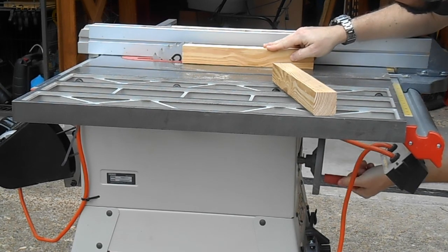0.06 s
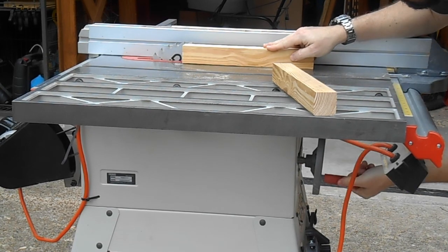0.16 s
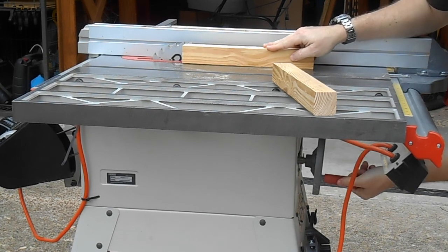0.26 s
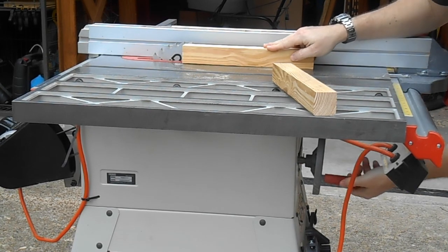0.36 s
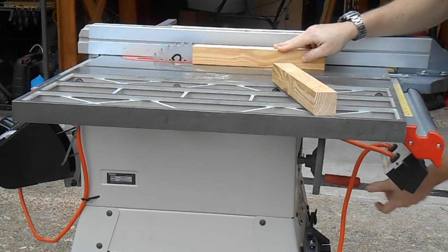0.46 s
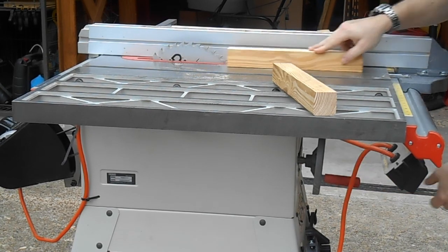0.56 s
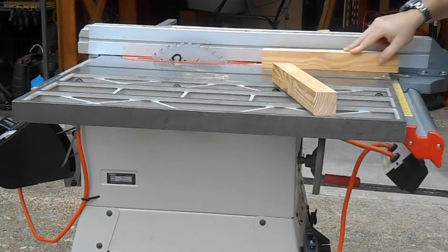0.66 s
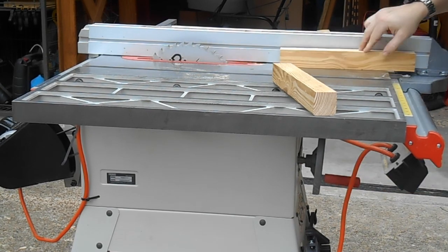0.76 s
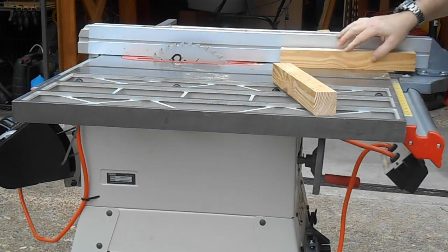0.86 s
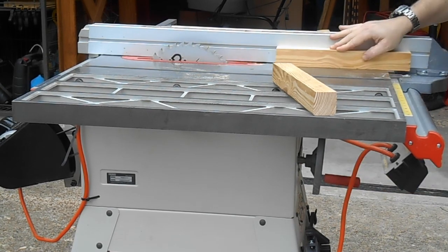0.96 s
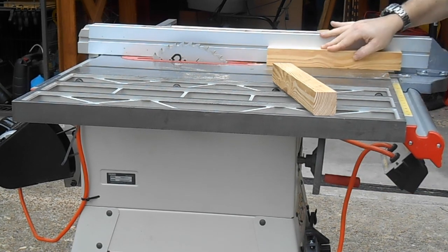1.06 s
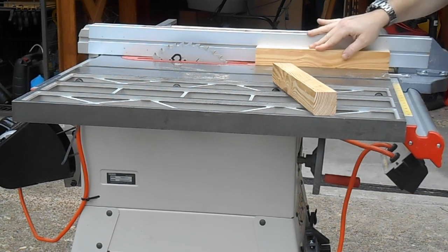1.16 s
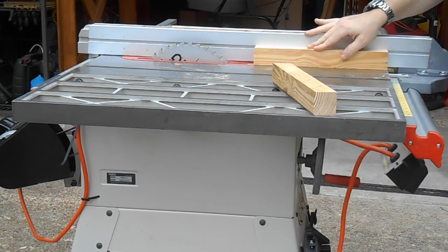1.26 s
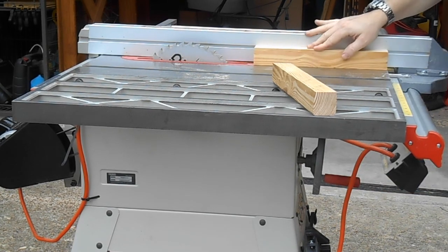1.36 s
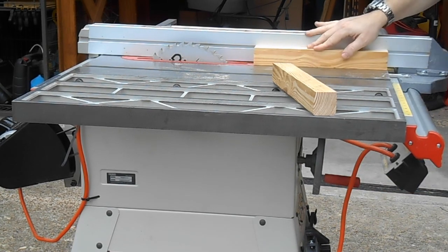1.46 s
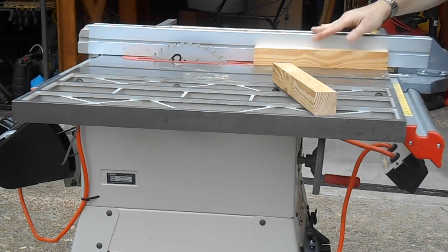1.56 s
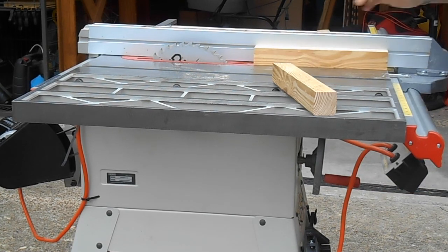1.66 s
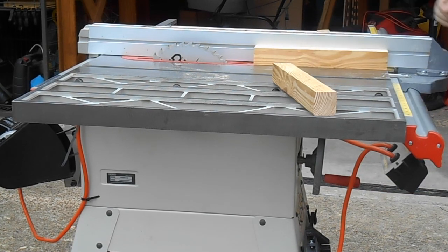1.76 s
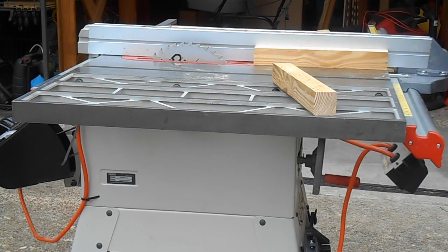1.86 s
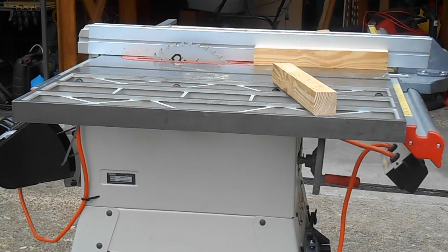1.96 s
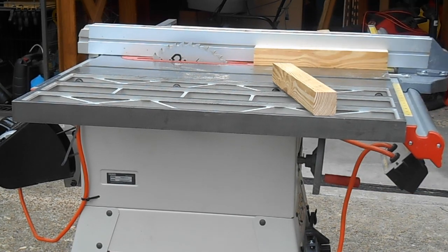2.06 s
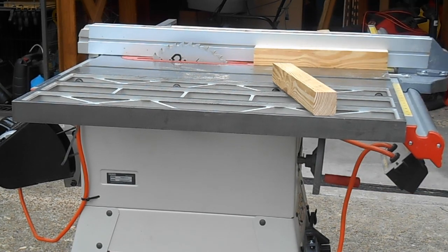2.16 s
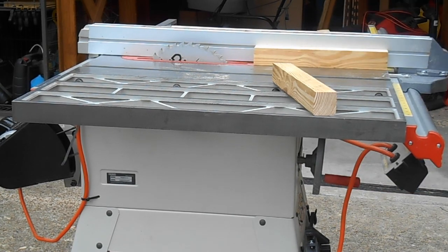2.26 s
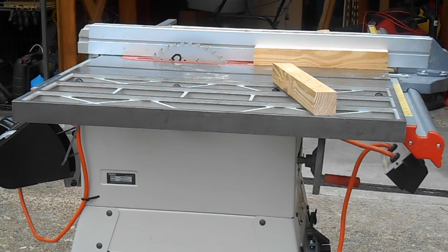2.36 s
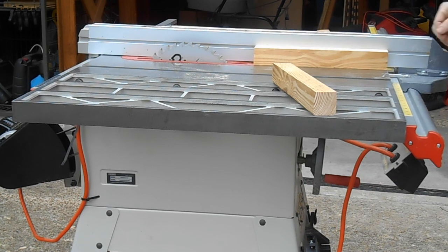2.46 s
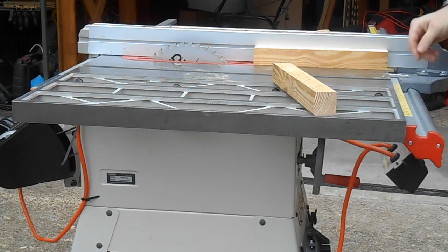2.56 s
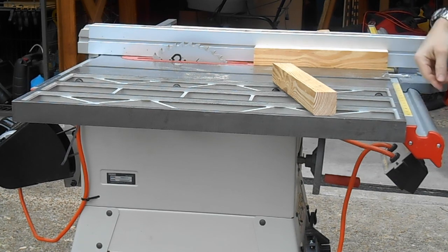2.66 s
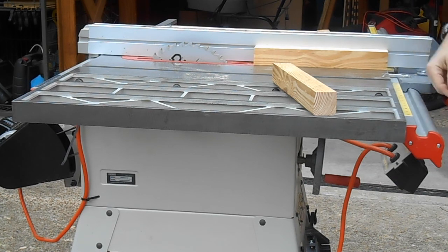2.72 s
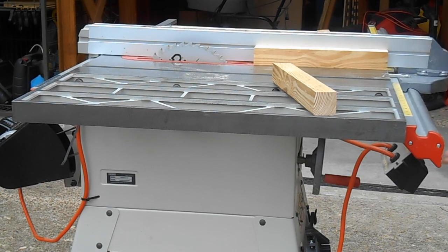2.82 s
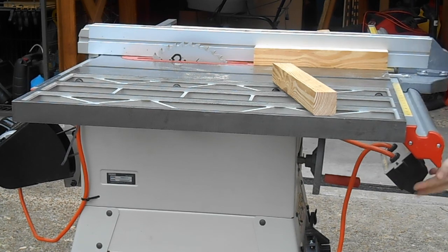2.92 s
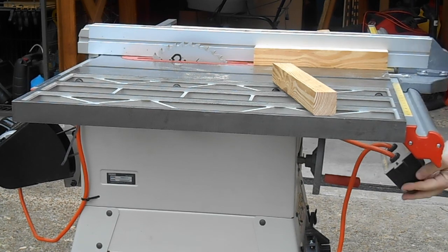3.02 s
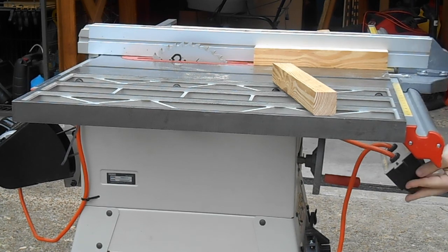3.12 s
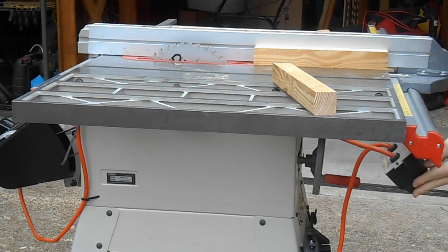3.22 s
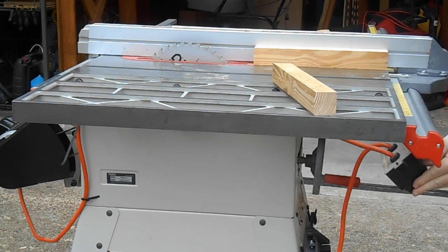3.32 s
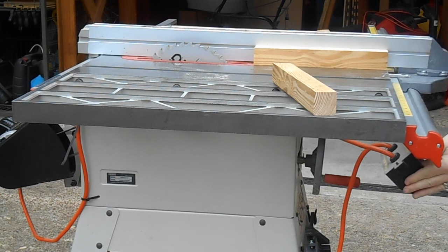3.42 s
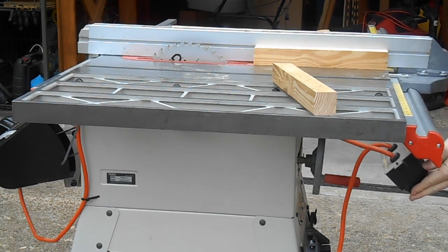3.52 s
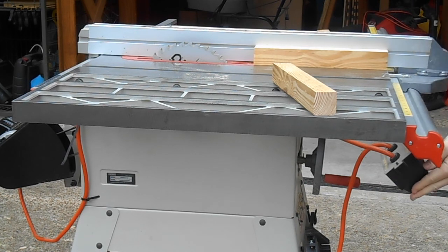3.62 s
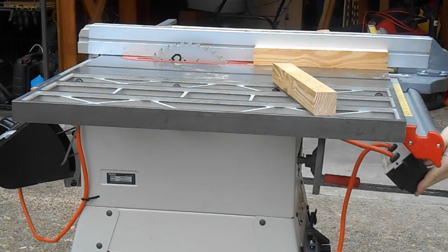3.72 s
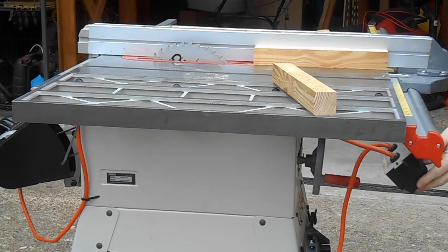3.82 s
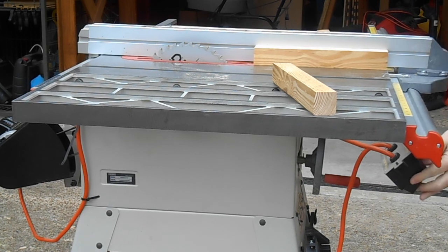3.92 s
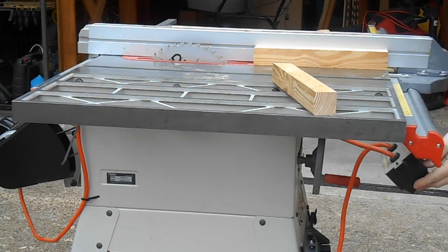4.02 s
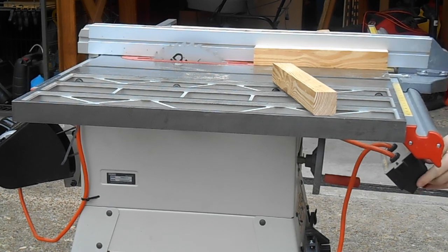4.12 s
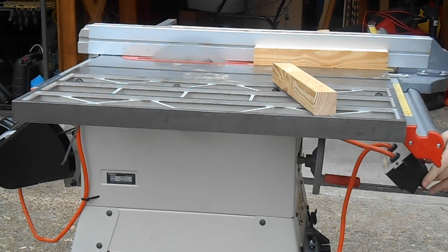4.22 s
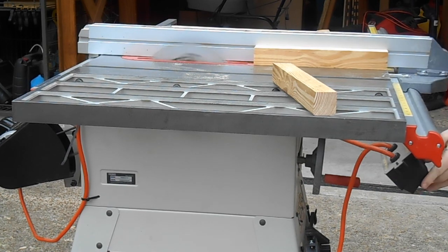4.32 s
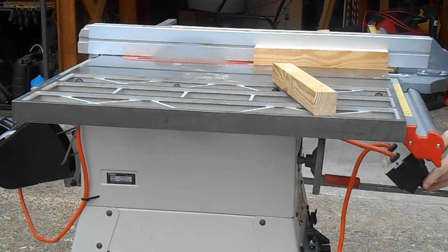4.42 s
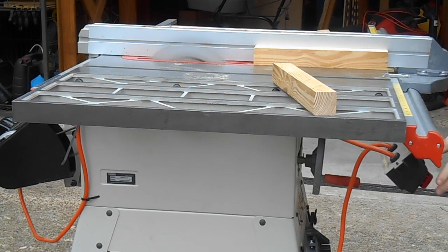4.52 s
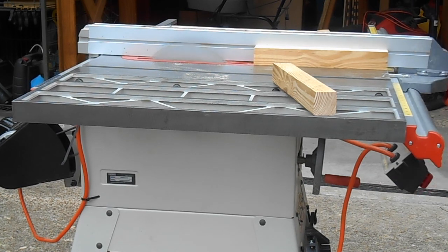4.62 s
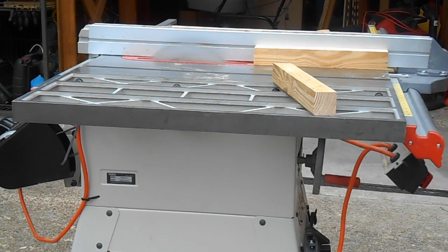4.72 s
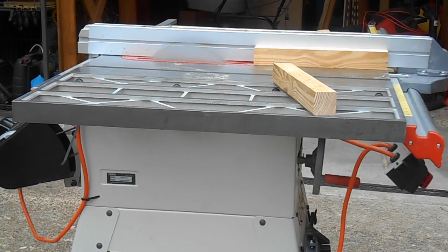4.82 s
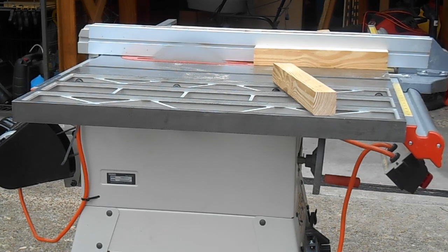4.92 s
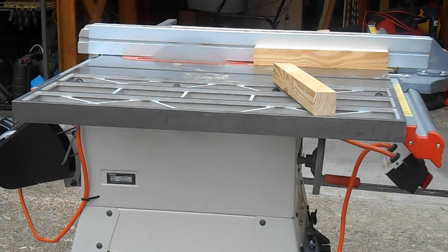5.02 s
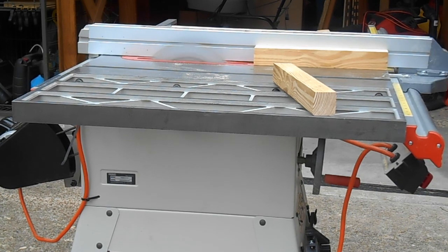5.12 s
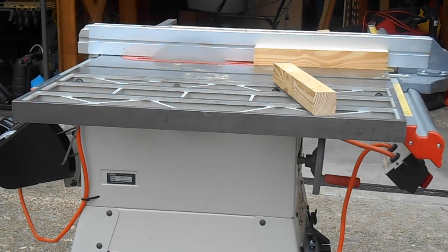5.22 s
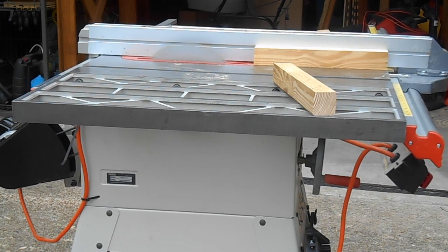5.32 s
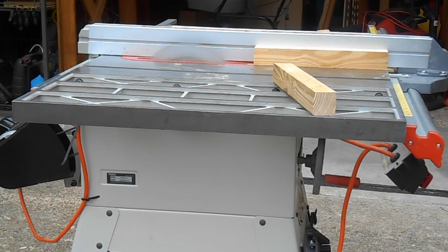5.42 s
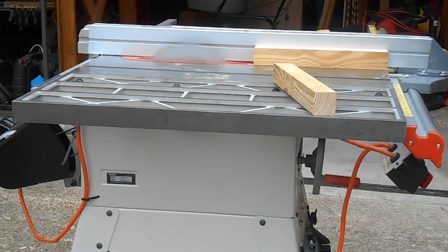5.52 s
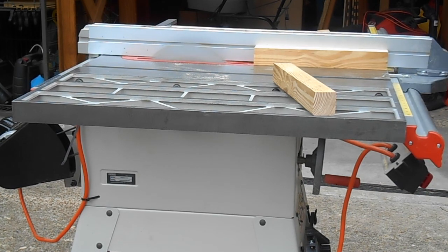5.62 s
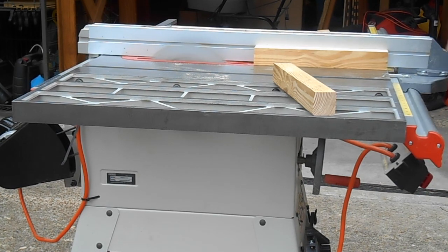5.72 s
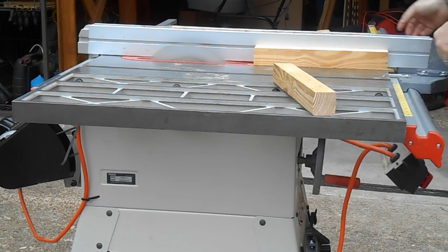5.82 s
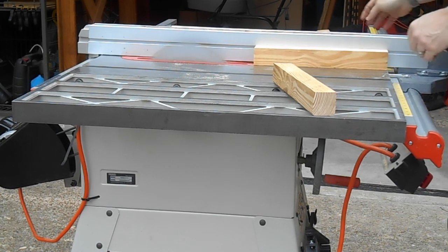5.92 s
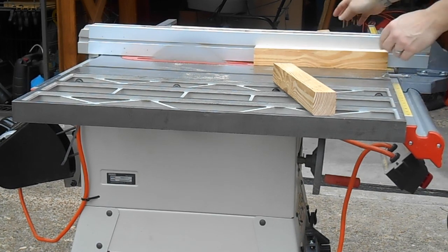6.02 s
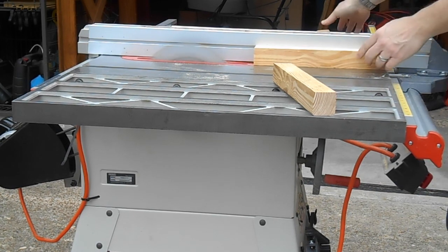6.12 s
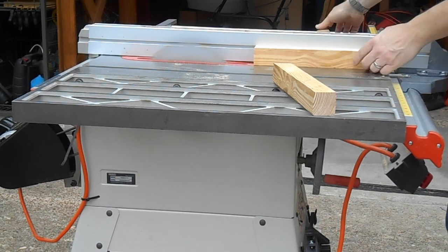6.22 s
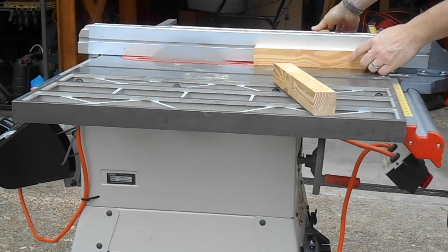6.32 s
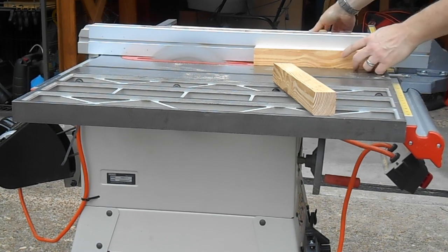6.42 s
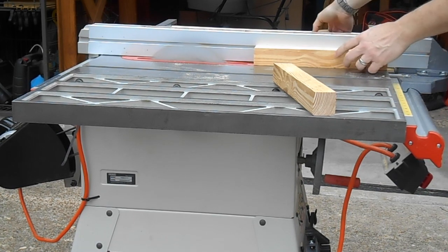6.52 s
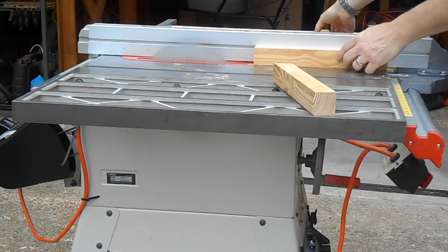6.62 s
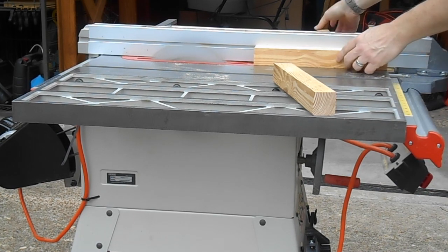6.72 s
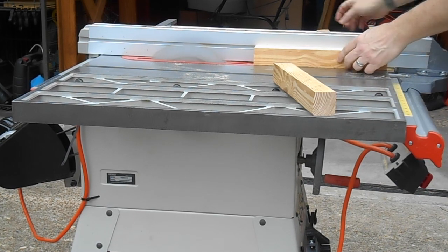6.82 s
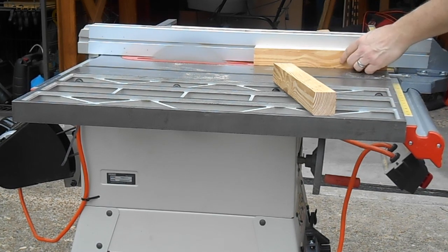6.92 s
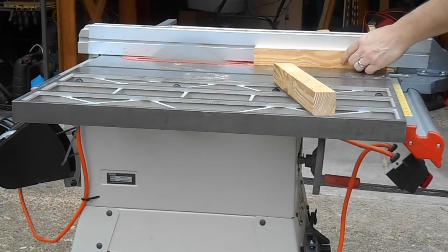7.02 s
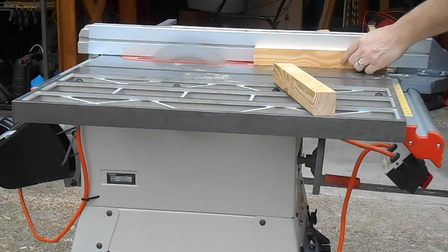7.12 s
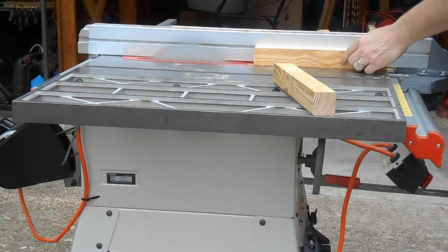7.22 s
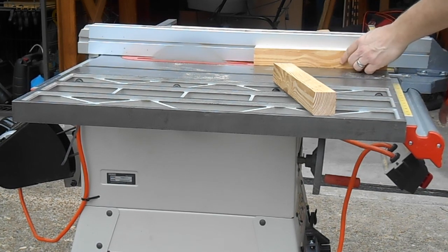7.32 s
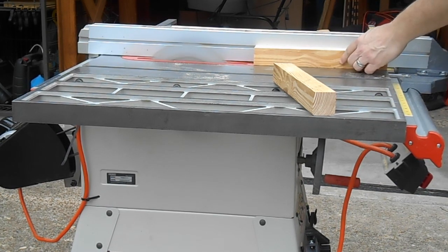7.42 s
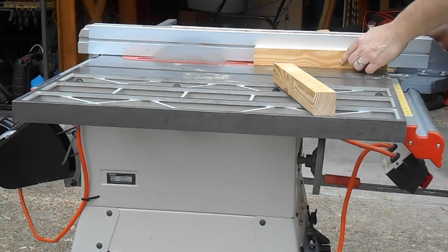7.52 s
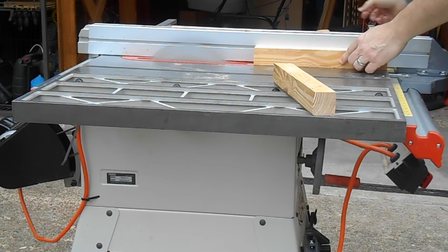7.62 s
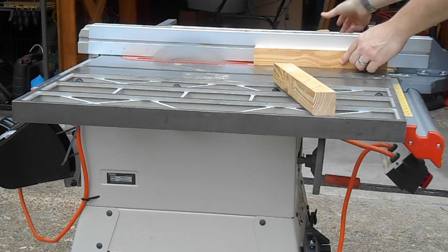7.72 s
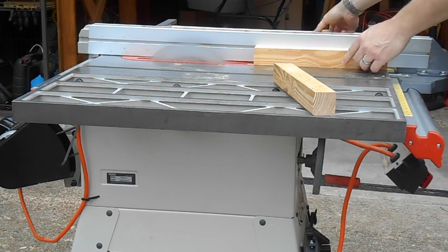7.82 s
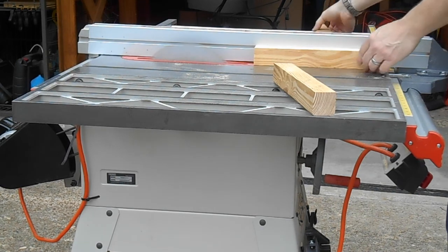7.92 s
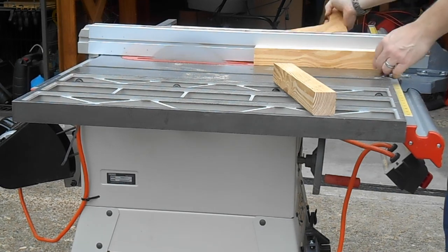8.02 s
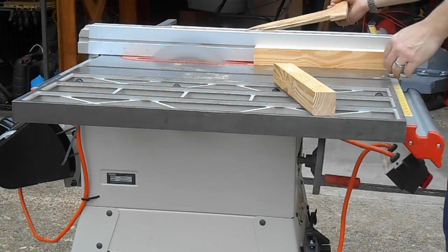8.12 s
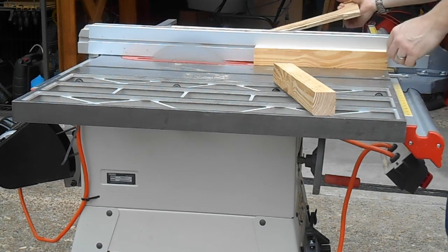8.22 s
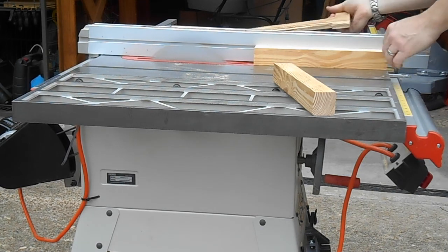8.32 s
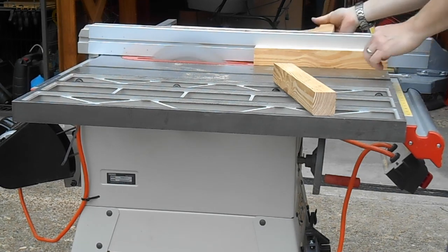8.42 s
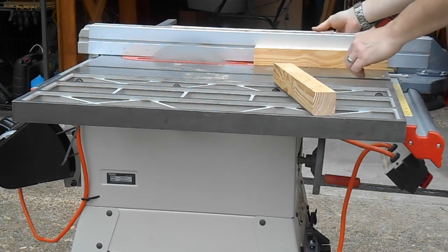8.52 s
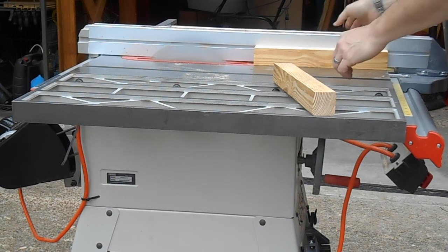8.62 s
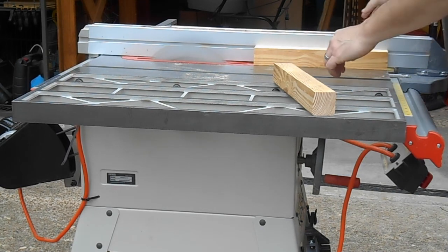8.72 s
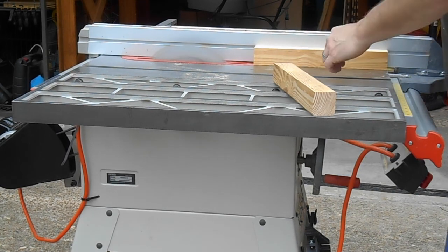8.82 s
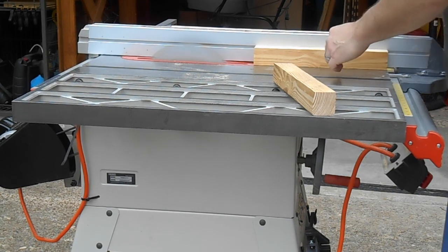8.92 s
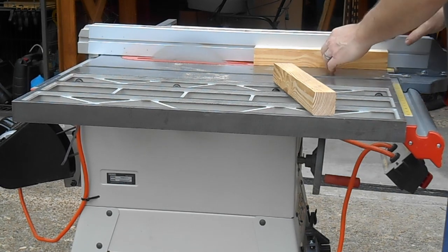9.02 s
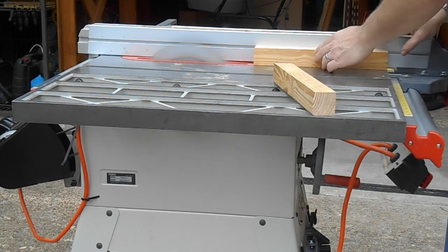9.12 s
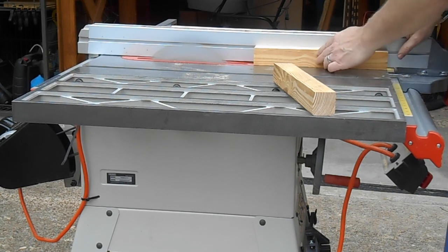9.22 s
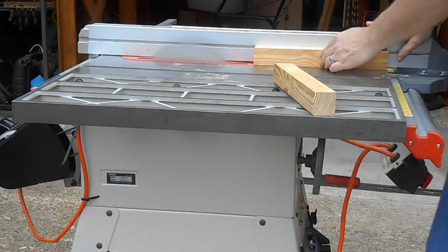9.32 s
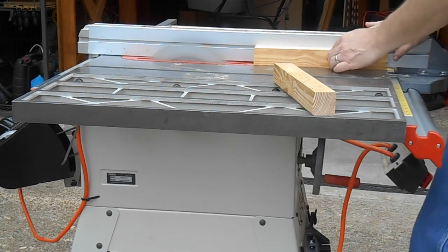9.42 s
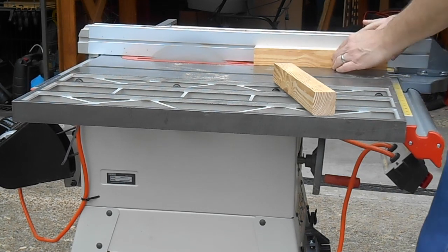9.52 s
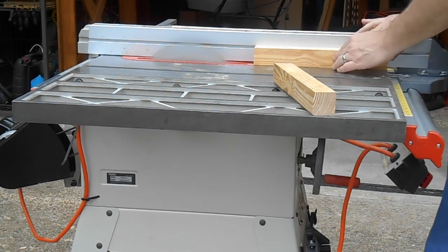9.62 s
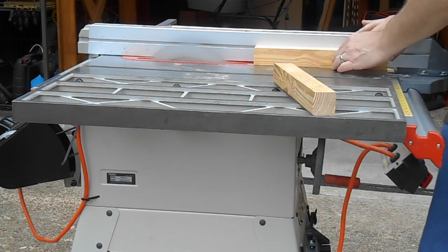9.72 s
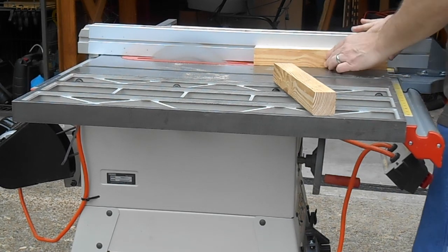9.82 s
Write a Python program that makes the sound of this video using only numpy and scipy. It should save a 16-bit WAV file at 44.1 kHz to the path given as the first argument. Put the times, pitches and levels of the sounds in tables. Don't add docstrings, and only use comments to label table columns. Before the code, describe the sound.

A pine block slides, squeals and knocks on a metal table, a switch clacks, then a table saw winds up to a loud steady whistle.

```python
import sys
import numpy as np
from scipy import signal
from scipy.fft import rfft, irfft, next_fast_len
from scipy.io import wavfile
from scipy.ndimage import uniform_filter1d, map_coordinates

SR = 44100
rng = np.random.default_rng(int(sys.argv[2]) if len(sys.argv) > 2 else 0)


def generate_wav(signal):
    frames = np.transpose(np.atleast_2d(signal))
    scaled = np.clip(frames, -1, 1) * 32767
    pcm = np.round(scaled).astype(np.int16)
    wavfile.write(sys.argv[1], SR, pcm)


def gain_from_db(level_db):
    decades = np.asarray(level_db, float) / 20
    return 10 ** decades


N = 434826
T = np.arange(N) / SR
FAST = next_fast_len(N)
HZ = np.fft.rfftfreq(FAST, 1 / SR)


def evened(x):
    return x / np.sqrt(np.mean(x ** 2) + 1e-20)


def read(points, hz):
    f, value = np.transpose(points)
    return np.interp(np.log(hz + 1), np.log(f + 1), value)


def curves(rows):
    s, *columns = np.transpose(rows)
    return [np.interp(T, s, c) for c in columns]


def peaks(modes):
    power = 0
    for hz, width_hz, db in modes:
        power = power + gain_from_db(db) ** 2 / (1 + (2 * (HZ - hz) / width_hz) ** 2) ** 2
    return np.sqrt(power)


def noise(gain, lo_hz=0, hi_hz=SR):
    z = rfft(rng.standard_normal(FAST)) * gain
    power = 2 * np.sum(abs(z[(HZ > lo_hz) & (HZ < hi_hz)]) ** 2) / FAST ** 2
    return irfft(z, FAST)[:N] / np.sqrt(power)


def drift(size):
    return evened(uniform_filter1d(uniform_filter1d(rng.standard_normal(N), size), size))


def resonate(x, hz, width_hz):
    turn = np.exp(2j * np.pi * np.cumsum(hz * np.ones(len(x))) / SR)
    r = np.exp(-np.pi * width_hz / SR)
    return 2 * (turn * signal.lfilter([1 - r], [1, -r], x / turn)).real


def highpass(x, hz):
    return signal.lfilter(*signal.butter(2, 2 * hz / SR, "high"), x)


def tones(modes, t):
    return sum(gain_from_db(db - 60 * t / t60_s) * np.sin(2 * np.pi * hz * t) for hz, db, t60_s in modes)


def dying(colour, t60, seconds):
    hz, t, z = signal.stft(rng.standard_normal(round(seconds * SR)), SR, nperseg=128, noverlap=96)
    gain = gain_from_db(read(colour, hz)[:, None] - 60 * t / read(t60, hz)[:, None])
    return signal.istft(z * gain, SR, nperseg=128, noverlap=96)[1]


def stroke(start_s, length_s, db, rise_s, fade_db):
    u = (T - start_s) / length_s
    rise = np.clip((T - start_s) / rise_s, 0, 1) ** 2
    end = np.clip((1 - u) * 10 + 1, 0, 1)
    return gain_from_db(db + fade_db * np.clip(u, 0, 1) ** 2) * rise * end


def add(mix, s, sound):
    part = mix[round(s * SR):][:len(sound)]
    part += sound[:len(part)]


def yard():
    # [f/Hz, level/dB per Hz]
    hiss_db = [(30, -23), (55, 3.5), (110, 0.5), (200, -4.5), (400, -5.5), (650, -1.5), (1200, -2),
               (2500, -3.5), (4000, -6.5), (7000, -10), (10000, -17)]
    start_db, rise_db_per_s = -49.5, 1.0
    hiss = noise(gain_from_db(read(hiss_db, HZ)) * (HZ > SR / 1500), 200)
    return gain_from_db(start_db + rise_db_per_s * T + 0.13 * drift(size=3000)) * hiss


def far_machine():
    # [t/s, f/Hz, level/dB]
    whine_path = [(1.9, 2700, -74), (2.15, 2780, -51.5), (2.5, 2100, -53), (2.8, 2300, -53),
                  (3.1, 2700, -57.5), (3.5, 2840, -53.5), (4.2, 2750, -52), (4.6, 2800, -62)]
    hz, db = curves(whine_path)
    whine = rng.standard_normal(N)
    for _ in range(2):
        whine = resonate(whine, hz, 400.0)
    return gain_from_db(db) * evened(whine) * gain_from_db(0.99 * drift(size=2500))


def wind():
    # [t/s, level/dB]
    steady = [(0, -49.5), (2.9, -54), (9.86, -65)]
    # [start/s, length/s, level/dB]
    bumps = [(.66, 0.055, -47), (1.04, 0.12, -36), (1.19, 0.054, -31), (1.8, 0.046, -49), (1.95, .08, -44),
             (2.33, 0.061, -50), (2.5, 0.066, -49)]
    # (f/Hz, level/dB per Hz)
    rumble_db = [(20, -2.5), (70, -1.5), (130, -8), (250, -56)]
    bump_rise_s, bump_fade_db, lumps_db = 0.037, -10, 2.5
    rumble = noise(gain_from_db(read(rumble_db, HZ)) * (HZ > SR / 2000))
    level = gain_from_db(curves(steady)[0] + lumps_db * drift(size=2500))
    level = level + sum(stroke(*row, bump_rise_s, bump_fade_db) for row in bumps)
    return gain_from_db(-2.0) * level * rumble


def garage(x):
    # [f/Hz, t60/s]
    room_t60 = [(300, 0.6), (1500, 0.22), (5000, 0.23), (10000, 0.19)]
    tail = dying([(100, 0), (10000, 0)], room_t60, 1 / 2)
    tail[:150] = 0
    return signal.fftconvolve(x, tail / np.linalg.norm(tail))[:N]


def ticks():
    # [t/s, peak/dB, f/Hz]
    taps = [(.8283, -31, 3800), (.8473, -29, 2400), (.8899, -24, 2900), (.8964, -10.5, 1700),
            (1.3167, -19, 3100), (1.3213, -25, 4870), (1.3254, -16, 3700), (1.3507, -31, 3400),
            (1.3927, -28, 2130), (1.4448, -23, 5500), (1.4497, -25, 2320), (1.5424, -30, 4320),
            (1.5498, -32, 3100), (1.3877, -26, 2200), (1.4316, -23, 2520), (1.4412, -21, 2900),
            (1.5209, -29, 3990), (1.5379, -25, 4160), (1.5718, -22, 3270), (1.5854, -27, 2200),
            (1.6023, -28, 4470), (1.6257, -4, 3200), (1.6945, -28, 4520), (1.7075, -27, 3550),
            (1.7414, -13, 4300), (1.942, -17, 4300), (1.7305, -33, 6000), (1.61, -30, 4000),
            (2.0644, -33, 5000), (2.2787, -24, 2800), (2.3081, -16, 3800), (2.3135, -12, 3140),
            (2.3338, -16, 1990), (2.3368, -14, 3600), (3.6296, -18, 3330), (3.6696, -24, 2440),
            (3.691, -24, 2740), (3.7374, -23, 4200), (3.8242, -17, 3610), (3.8405, -32, 4000),
            (3.8504, -29, 4500)]
    # [t/s, peak/dB, f/Hz]
    slips = [(0.9148, -17, 2430), (1.1472, -20, 2640), (1.1611, -17, 3530), (1.1706, -23, 3340),
             (1.1894, -21, 3200), (1.1946, -25, 3650), (1.1998, -23, 3330), (1.2067, -23, 3410),
             (1.2149, -16, 3140), (1.2264, -20, 3380), (1.2311, -27, 3350), (1.2359, -22, 4030),
             (1.2464, -20, 4130), (1.2542, -20, 3680), (1.2718, -19, 3440), (1.2776, -19, 3630),
             (1.2829, -23, 3830), (1.2923, -21, 3130), (1.298, -28, 3190), (2.3525, -10, 3180),
             (2.3651, -12, 3710), (2.3708, -15, 4440), (2.3904, -13, 3280), (2.3969, -18, 3410),
             (2.4013, -16, 3690), (2.428, -16, 3660), (2.432, -20, 3880), (2.4406, -16, 3710),
             (2.4536, -20, 3660), (2.458, -25, 5910), (2.4632, -25, 3720)]
    # [t/s, peak/dB, f/Hz, width/f, t60/s]
    start_ticks = [(4.264, -17, 6000, 1.3, 0.024), (4.475, -34, 7900, .1, .02),
                   (4.618, -17.5, 6640, 0.18, 0.026), (4.634, -18, 6460, 0.21, 0.029),
                   (4.684, -21, 6800, .15, 0.019), (4.701, -18, 7200, .3, .015),
                   (4.726, -14, 7160, 0.24, 0.057), (4.749, -3.5, 7400, 1, 0.11),
                   (4.774, -3, 8500, 0.79, 0.046)]
    # [t/s, peak/dB, f/Hz, width/f, t60/s]
    scuffs = [(.515, -32.5, 800, .9, .2), (.873, -28, 1750, .2, .05), (.905, -27, 3000, 1, .06),
              (1.324, -29, 6000, 1, 0.092), (1.943, -21, 4500, .9, .14), (2.914, -27, 5000, .9, .04),
              (2.917, -30.5, 1050, 0.57, .03), (2.955, -28, 4800, .7, .04), (2.967, -30, 6500, 1, .04),
              (3.756, -29, 1500, 1.4, .07), (3.884, -32, 6500, 1.5, .09), (3.912, -38, 9000, 1, .05),
              (4.02, -30, 6000, 1.4, 0.076), (4.118, -32, 3000, 1, .12), (4.146, -27, 5000, 1.2, .1),
              (4.725, -24, 3000, .15, .15), (4.746, -16, 5620, .12, .14)]
    tick_width, tick_t60_s, slip_boost_db, scuff_rise_s = 0.9, 0.009, 2.5, 0.004

    boosted = [(s, db + slip_boost_db, hz) for s, db, hz in slips]
    snaps = [(*row, tick_width, tick_t60_s) for row in taps + boosted] + start_ticks
    out, t = np.zeros(N), np.arange(4000) / SR
    for k, (s, db, hz, wide, t60_s) in enumerate(snaps + scuffs):
        push = rng.standard_normal(len(t)) * gain_from_db(-18 - 60 * t / max(t60_s, 0.002))
        if k < len(snaps):
            push = push + (t == 0)
        else:
            push = push * np.minimum(t / scuff_rise_s, 1)
        width_hz = hz * np.clip(wide, 0.1, 2)
        sound = resonate(resonate(push, hz, width_hz), hz, 1.6 * width_hz)
        sound = highpass(sound, min(0.4 * hz, 3000))
        add(out, s + 0.0008, gain_from_db(db - 1.5) * sound / abs(sound).max())
    return out


def rubs():
    # [start/s, length/s, level/dB, f/Hz]
    rub_strokes = [(0.804, 0.13, -44, 2050), (0.872, 0.14, -39.5, 1930), (1.14, 0.056, -40, 2150),
                   (1.186, 0.13, -41.5, 3900), (1.303, .08, -45, 3000), (1.377, 0.059, -42, 2600),
                   (1.42, .07, -39, 2300), (1.521, 0.038, -43, 3300), (1.562, .05, -44, 3200),
                   (2.0, 0.083, -50, 2900), (2.205, 0.066, -46.5, 2600), (2.302, 0.023, -22.5, 3400),
                   (2.327, 0.031, -27, 2200), (2.351, 0.096, -27, 3180), (2.447, .08, -41, 2900),
                   (2.923, 0.02, -43, 2300), (3.825, .03, -45, 4500), (3.88, 0.05, -47, 2900)]
    clicks_per_s, rise_s, fade_db = 2600, 0.0066, -11.5
    grit = (rng.random(N) < clicks_per_s / SR) * rng.uniform(-1, 1, N)
    grit = grit * gain_from_db(2 * np.minimum(rng.exponential(1, N), 2))
    grit = evened(grit * gain_from_db(3.5 * drift(size=200))) + 0.7 * rng.standard_normal(N)
    starts, _, _, centres = np.transpose(rub_strokes)
    hz = centres[np.maximum(np.searchsorted(starts, T) - 1, 0)]
    level = sum(stroke(s, length, db, rise_s, fade_db) for s, length, db, _ in rub_strokes)
    wide = signal.lfilter(*signal.butter(1, [700 / SR * 2, 4500 / SR * 2], "band"), grit)
    return level * evened(evened(resonate(grit, hz, 1300.0)) + 0.54 * evened(wide))


def glide():
    # [start/s, length/s, high squeals/dB, middle squeals/dB, low squeals/dB]
    slides = [(0.4, 0.4, -46, -46, -46), (.43, .08, -70, -50, -50), (.49, .11, -48, -50, -42),
              (.6, .11, -48, -48, -48), (.735, .07, -70, -70, -46), (1.04, 0.115, -43, -60, -46)]
    # [f/Hz, width/Hz, level/dB]
    high_squeals = [(7340, 350, 0), (8200, 250, -8), (9500, 500, -11), (6650, 250, -11), (12100, 1500, -10)]
    mid_squeals = [(3620, 220, 0), (4350, 200, 1), (5410, 300, -6)]
    low_squeals = [(1000, 500, -10), (1870, 90, -2), (2150, 160, 0), (1260, 80, -8)]
    rise_share, fade_db, hiss_share = 0.36, -10, 0.95
    low_sag_per_s = 0.3

    out = np.zeros(N)
    families = (high_squeals, 0), (mid_squeals, 0), (low_squeals, low_sag_per_s)
    for column, (modes, sag_per_s) in enumerate(families):
        squeal = np.zeros(N)
        for hz, width_hz, db in modes:
            tone = np.sqrt(width_hz) * noise(peaks([(hz, width_hz, 0)]))
            squeal += gain_from_db(db + 2.6 * drift(size=600)) * tone
        pitch = 1 + 0.02 * drift(size=1200) - sag_per_s * np.clip(T - 0.55, -0.1, 0.3)
        squeal = map_coordinates(squeal, [np.cumsum(pitch)], mode="wrap")
        hiss = noise(peaks([(modes[0][0] + 1300.0, 5000.0, 0)]))
        level = sum(stroke(s, length, db[column], rise_share * length, fade_db)
                    for s, length, *db in slides)
        out += level * evened(evened(squeal) + hiss_share * hiss)
    return out


def blows():
    # [t/s, peak/dB]
    block_hits = [
        (0.996, -12),
        (.919, -27),
    ]
    switch_hits = [
        (4.1655, -4.5),
        (4.1683, -1),
    ]
    stick_hits = [
        (8.551, 0),
        (8.561, -2),
    ]
    # [f/Hz, level/dB per Hz]
    block_db = [(200, -50), (380, -22), (750, -9), (1020, -12), (1350, 5), (1700, -4), (2060, -4),
                (3400, -22), (3900, -16), (6500, -28), (7550, -23), (12000, -34)]
    switch_db = [(250, -46), (441, -12), (900, -18.5), (1600, -6.5), (1900, -12), (2560, -3), (3600, -4),
                 (4100, 2.5), (6800, -5), (10000, -14.5), (13000, -12)]
    stick_db = [(500, -22), (1000, -14), (1600, 5), (2500, -3), (3500, -4), (4700, 0), (5600, -4),
                (7000, -13), (10000, -20), (12000, -20)]
    # [f/Hz, t60/s]
    block_t60 = [(400, .13), (750, .15), (1300, .03), (1700, .025), (2300, .045), (4000, .025), (9000, .02)]
    switch_t60 = [(450, 0.37), (1000, 0.13), (2200, 0.053), (5000, 0.015), (10000, 0.022)]
    stick_t60 = [(1500, 0.04), (5000, 0.055), (10000, .02)]
    # [f/Hz, level/dB, t60/s]
    table_ring = [(458, -32, 0.11), (711, -26, 0.13), (4904, -46, 0.22), (1340, -10, 0.022),
                  (1150, -17, 0.025)]
    box_ring = [(458, -32, .17), (790, -31, .07)]

    out, t = np.zeros(N), np.arange(SR // 3) / SR
    crack = np.minimum(t / 0.00062, 1) * (1 + 1.95 * np.exp(-t / 0.001))
    objects = ((block_hits, block_db, block_t60), (switch_hits, switch_db, switch_t60),
               (stick_hits, stick_db, stick_t60))
    for hits, colour, t60 in objects:
        for s, db in hits:
            sound = dying(colour, t60, 1 / 3)
            sound[:len(t)] *= crack
            sound = highpass(sound, colour[1][0])
            add(out, s, gain_from_db(db) * sound / abs(sound).max())
    add(out, block_hits[0][0], np.minimum(t * 1340, 1) * tones(table_ring, t))
    add(out, switch_hits[1][0], np.minimum(t / 0.015, 1) * tones(box_ring, t))
    return out


def starter():
    # [f/Hz, width/Hz, level/dB]
    rings = [(5603, 900, 1), (6933, 230, -5), (8500, 690, -15), (3820, 350, 4)]
    return stroke(4.735, 0.4, -29.5, rise_s=0.05, fade_db=-5) * noise(peaks(rings))


def groans(speed):
    # [start/s, length/s, level/dB, rest f/Hz, climb f/Hz]
    surges = [(4.27, 0.094, -39, 457, 20), (4.272, 0.134, -46, 300, 12), (4.44, 0.18, -41, 458, 360),
              (4.459, 0.26, -43, 830, 680), (4.5, 0.087, -44, 1660, 150), (4.73, .06, -28, 2020, 12),
              (4.742, 0.21, -30, 954, 11), (4.822, 0.13, -35.5, 707, 11), (4.75, 0.5, -50.5, 100, 7.3),
              (4.8, .25, -35, 57, 1400), (4.8, .17, -35, 3700, 250), (4.8, .22, -37, 5700, 40),
              (4.6, .14, -39, 200, 3300), (4.8, .02, -36, 985, 12)]
    width_hz, rise_share, fade_db = 50.0, 0.3, -5
    out = np.zeros(N)
    for s, length, db, rest_hz, climb_hz in surges:
        span = slice(round((s - 0.1) * SR), round((s + 2 * length) * SR))
        hz = rest_hz + climb_hz * speed[span]
        tone = resonate(rng.standard_normal(len(hz)), hz, width_hz)
        tone = resonate(tone, hz, 2 * width_hz)
        out[span] += stroke(s, length, db, rise_share * length, fade_db)[span] * evened(tone)
    return out


def cabinet(speed):
    # [f/Hz, level/dB per Hz]
    wall_db = [(130, -28), (250, -15.5), (400, -11.5), (600, -9.5), (800, -9), (1100, -10), (1300, -9.5)]
    # [f/Hz, width/Hz, level/dB]
    panels = [(300, 40, -17), (463, 35, -1), (560, 60, -12), (890, 50, -3), (958, 45, 2), (1015, 50, 0)]
    wall = noise(gain_from_db(read(wall_db, HZ)) * (HZ > 100) * (HZ < 1500), 330, 1370)
    shudder = gain_from_db(4 * drift(size=500) * (1 - speed))
    return 0.63 * shudder * noise(peaks(panels)) + 0.65 * wall * (0.51 + 0.4 * speed)


def tooth_whistle(speed):
    # [f/Hz, level/dB per Hz]
    whistle_db = [(1945, -45), (1985, -17), (2065, -9), (2215, -15.5), (2250, -7), (2310, -5), (2358, 1.5),
                  (2395, -2.5), (2432, 3), (2475, -5), (2540, -5.5), (2700, -9), (2900, -22), (3200, -29.5)]
    # [f/Hz, width/Hz, level/dB]
    housing = [(1330, 650, -0.5), (1700, 240, 4), (2080, 280, 1), (2700, 1050, -0.5)]
    steady = noise(gain_from_db(read(whistle_db, HZ)) * (HZ > 1900) * (HZ < 3300))
    whistle = map_coordinates(steady, [np.cumsum(speed)], order=3)
    sings = np.clip((speed - 0.52) / 0.2, 0, 1)
    return sings * whistle + np.sqrt(1 - sings ** 2) * noise(peaks(housing))


def air_rush(speed):
    # [f/Hz, level/dB per Hz]
    rush_db = [(1100, -8.5), (1250, 4.5), (1500, 2.5), (1900, 3), (2100, 6.5), (3000, 6), (3230, 1.5),
               (3500, -0.5), (4200, -1), (5000, -3), (6300, -4), (8000, -6), (10000, -8.5)]
    # [f/Hz, width/Hz, level/dB]
    blade = [(1456, 90, 6), (3120, 70, 5), (3340, 150, 4), (3935, 90, 2), (4367, 10, 7), (4400, 10, 4),
             (4627, 10, 2), (6551, 70, 2), (6670, 35, 1), (8800, 250, -8)]
    rush_gain = gain_from_db(read(rush_db, HZ))
    gains = [rush_gain * (HZ > 3400), rush_gain * (HZ > 1000) * (HZ < 3400), peaks(blade)]
    z = rfft(rng.standard_normal((3, FAST))) * gains
    unit = np.std(irfft(z[0] * (HZ < 10000), FAST))
    hiss, roar, ring = irfft(z, FAST)[:, :N] / unit
    ring_up = np.clip((T - 4.9) / 0.18, 0, 1)
    return hiss + roar * speed ** 0.55 + ring * ring_up


def shaft_orders(speed, turns):
    # [multiple of turning rate, level/dB]
    steady_orders = [(2, -63), (4, -60), (7, -58), (12, -58), (16, -55)]
    # [start/s, length/s, level/dB, multiple of turning rate]
    swells = [(5.9, 1.3, -47.5, 5), (7.0, 1.7, -54, 5), (9.0, 1.3, -46, 5), (5.02, .55, -42, 10),
              (5.55, .9, -46, 10), (6.3, 2.5, -41, 10), (8.8, .6, -49, 10), (9.4, .7, -47.5, 10)]
    swell_rise_share, swell_fade_db = 0.3, -7
    plate_hz, plate_db, plate_waver_hz = 6551, -43.5, 19

    out = np.zeros(N)
    for k, db in steady_orders:
        out += gain_from_db(db + 2.9 * drift(size=5000)) * np.cos(2 * np.pi * k * turns) * speed ** 4
    for k, quiet_db in (5, -59), (10, -53):
        power = (gain_from_db(quiet_db) * speed ** 10) ** 2
        for s, length, db, order in swells:
            if round(order) == k:
                power = power + stroke(s, length, db, swell_rise_share * length, swell_fade_db) ** 2
        out += np.sqrt(power) * np.cos(2 * np.pi * k * turns)
    plate = np.cos(2 * np.pi * np.cumsum(plate_hz + plate_waver_hz * drift(size=500)) / SR)
    return out + gain_from_db(plate_db + 1.1 * drift(size=1500)) * plate * speed ** 20


def saw_levels(speed):
    # [t/s, depth/dB]
    ducks = [
        (5.55, -2.5),
        (8.58, -3.5),
    ]
    # (running/dB, power of speed, pull/dB, hum/dB, jolt/dB)
    parts = [(-36.5, 1.24, 7.5, -41.5, -28), (-16, 3.7, 3.5, -44.5, -38), (-29.5, 2.88, 6.5, -54, -46)]
    on_s, jolt_rise_s, jolt_t60_s = 4.258, 0.016, 0.67
    pull_ends_s, pull_fade_s = 4.97, 0.14
    open_db, duck_s, recover_s = 1.21, 0.022, 0.6

    after = np.maximum(T - on_s, 0)
    pull = np.clip(1 - (T - pull_ends_s) / pull_fade_s, 0, 1)
    ride_db = open_db
    for s, db in ducks:
        recovery = np.exp(-np.maximum(T - s, 0) / recover_s)
        ride_db = ride_db + db * np.clip((T - s) / duck_s, 0, 1) * recovery
    gains = []
    for run_db, exponent, pull_db, hum_db, jolt_db in parts:
        run = gain_from_db(run_db + ride_db + pull_db * pull) * speed ** exponent
        jolt = gain_from_db(jolt_db - 60 * after / jolt_t60_s)
        gains.append(np.minimum(after / jolt_rise_s, 1) * np.sqrt(run ** 2 + gain_from_db(hum_db) ** 2 + jolt ** 2))
    return gains


def saw():
    # [t/s, share of full speed]
    spin_up = [(4.25, 0.032), (4.5, 0.24), (4.6, 0.41), (4.72, 0.58), (4.8, 0.71), (4.9, .835),
               (4.97, 0.935), (5.03, 1.0)]
    turns_hz = 59.86
    speed = np.clip(curves(spin_up)[0], 0.01, 1)
    cabinet_gain, whistle_gain, rush_gain = saw_levels(speed)
    turns = np.cumsum(speed) * turns_hz / SR
    throb = 1 + 0.053 * np.cos(2 * np.pi * 2 * turns)
    eddies = gain_from_db(0.6 * drift(size=300))
    air = whistle_gain * tooth_whistle(speed) * eddies + rush_gain * air_rush(speed) * throb
    body = gain_from_db(-1.63) * cabinet_gain * cabinet(speed)
    return air + body + groans(speed) + starter() + np.sqrt(2) * shaft_orders(speed, turns)


def scene():
    background = yard() + far_machine() + wind()
    handling = ticks() + rubs() + glide() + blows()
    return (background + handling + gain_from_db(-9.0) * garage(handling) + saw())[None]


def top_cut(x):
    return signal.sosfilt(signal.butter(12, 13940, fs=SR, output="sos"), x)


def record(dry):
    # [f/Hz, level/dB]
    mic_db = [(9000, 0.5), (10200, -1.5), (10900, -17), (11400, -13.5), (12200, -12.5), (13000, -21),
              (13900, -34)]
    threshold, headroom = 0.65, 0.22
    over = np.maximum(abs(dry) - threshold, 0)
    limited = np.sign(dry) * (abs(dry) - over + headroom * np.tanh(over / headroom))
    coloured = irfft(rfft(limited, FAST) * gain_from_db(read(mic_db, HZ)), FAST)[:, :N]
    return top_cut(coloured)


dry = scene()
out = record(dry)
generate_wav(out)
```